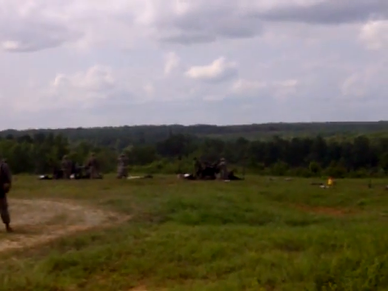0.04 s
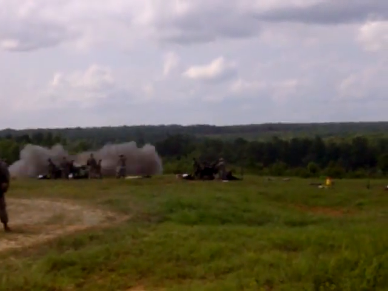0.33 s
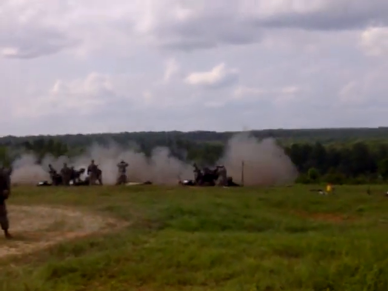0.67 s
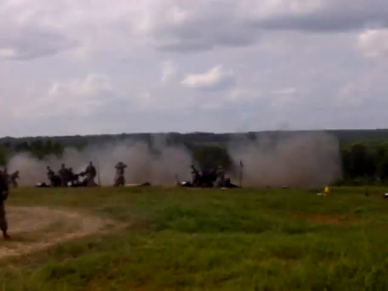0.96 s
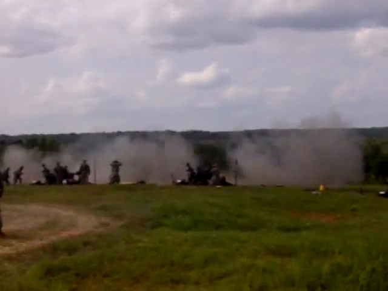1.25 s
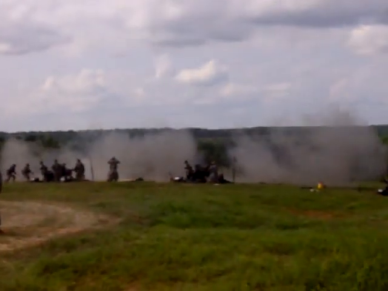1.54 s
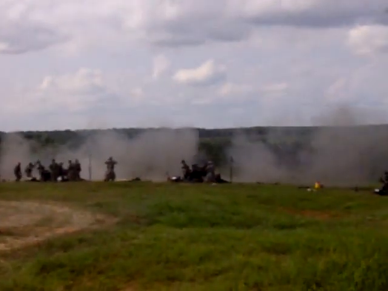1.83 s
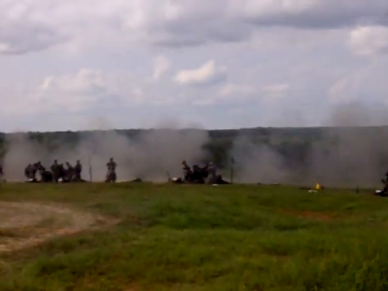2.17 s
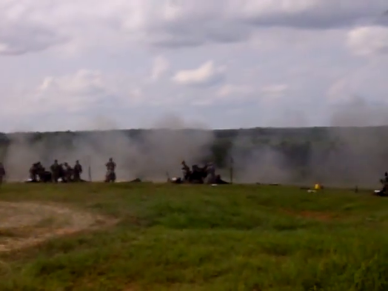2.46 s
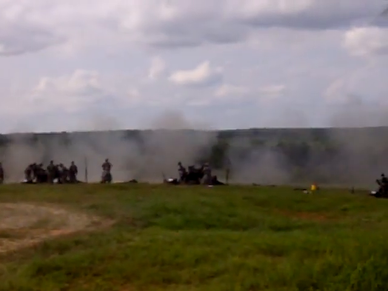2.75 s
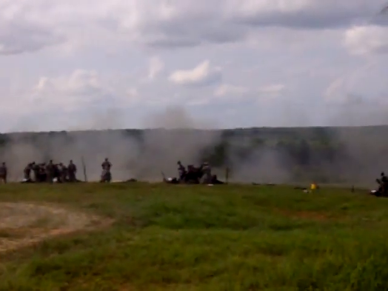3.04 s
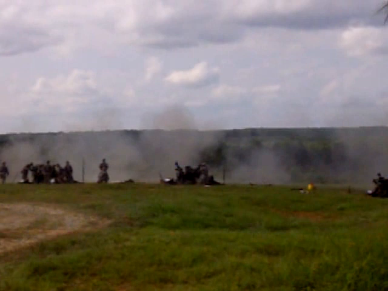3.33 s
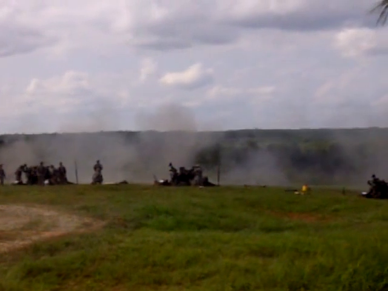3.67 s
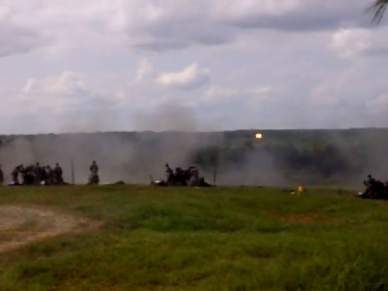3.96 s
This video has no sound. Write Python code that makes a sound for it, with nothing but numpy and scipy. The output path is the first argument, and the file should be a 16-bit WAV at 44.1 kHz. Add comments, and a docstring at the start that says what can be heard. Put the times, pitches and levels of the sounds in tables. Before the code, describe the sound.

An artillery gun fires once, its long roar echoing across an open field.

```python
"""A howitzer fires across an open field ringed by forest. Its shock front, just behind a short shudder,
overloads the microphone, which buzzes and lurches for some 50 ms. Bright scatter comes off the near
ground, then a long roar from the woods, duller the further it travels, with booms, thuds, claps and
faint whistles in it. Far off an engine idles under the steady hiss of the field."""
import sys
import numpy as np
from scipy import signal
from scipy.fft import rfft, irfft
from scipy.io import wavfile

SR = 44100
rng = np.random.default_rng(int(sys.argv[2]) if len(sys.argv) > 2 else 0)


def store_wav(level_fs):
    """Save 16-bit WAV to argv[1]."""
    pcm = np.round(np.clip(np.atleast_2d(level_fs), -1, 1) * 32767)
    wavfile.write(sys.argv[1], SR, pcm.T.astype(np.int16))


N = 176400
SHOCK_S = .7217   # the front reaches the microphone

# Spectrum of the gun's crack at the microphone: f/Hz, relative level/dB
CRACK_SPECTRUM = [(300, -3.5), (1500, 6.5), (2700, 4), (3800, 3.5), (5500, -2), (7000, -2), (8000, -21),
                  (9000, -30.5)]
def shock_front():
    """The howitzer's N-shaped pressure jump rings the microphone; a bright crack sizzles out behind it."""
    front_s, crack_decay_s, sizzle_decay_s = .0017, .00096, .031
    ring_hz, ring_decay_s = 4355, .00076
    age = np.maximum(clock() - SHOCK_S, 0)
    front = from_db(-5) * (2 * age / front_s - 1) * (age < front_s)
    ring = from_db(-1) * np.exp(-age / ring_decay_s) * np.sin(2 * np.pi * ring_hz * age)
    crack = from_db(1.5) * np.exp(-age / crack_decay_s)
    sizzle = from_db(-14) * np.exp(-age / sizzle_decay_s)
    return (clock() >= SHOCK_S) * (front + ring + (crack + sizzle) * noise(CRACK_SPECTRUM))


# Swells that reach the microphone first: t/s, length/s, f/Hz, peak level/dB
SHUDDERS = [(0.696, 0.018, 555, -22.5), (0.708, 0.0099, 330, -14)]
def shudder():
    """Two low swells just ahead of the front, probably carried by the ground."""
    out = np.zeros(N)
    for start, length, hz, db in SHUDDERS:
        age = clock() - start
        arch = np.sqrt(np.abs(np.sin(np.pi * np.clip(age / length, 0, 1))))
        out += from_db(db) * arch * np.sin(2 * np.pi * hz * age)
    return out


# Buzzes of the overloaded microphone: t/s, length/s, f/Hz, peak level/dB
BUZZES = [(0.723, 0.012, 1872, -12.5), (0.741, 0.013, 2050, -16.5), (0.758, 0.0091, 1763, -17)]
# Pressure surges that throw it to either side: t/s, signed height/full scale
LURCHES = [(0.7351, -.7), (0.739, 0.6), (0.7398, -0.76), (0.754, -0.92), (0.7559, 0.9), (0.767, -0.48),
           (0.7703, 0.81), (0.7721, -0.98), (0.7741, 0.23), (0.7778, -0.71)]
def overloaded_microphone(sound):
    """The microphone buzzes and is thrown aside; while it does, it passes less of the sound."""
    waver, duck, edge_s = .095, .33, .0019
    rise_s, sag_s = .00029, .001
    t = clock()
    wavering_time = np.cumsum(1 + waver * drift(450)) / SR
    for start, length, hz, db in BUZZES:
        held = np.clip(np.minimum(t - start, start + length - t) / edge_s, 0, 1)
        buzz = from_db(db) * held * np.sin(2 * np.pi * hz * wavering_time)
        sound = sound * (1 - duck * held) + buzz
    for start, height in LURCHES:
        age = np.maximum(t - start, 0)
        thrown = (1 - np.exp(-age / rise_s)) * np.exp(-(age / sag_s) ** 2)
        sound = sound * (1 - np.sqrt(thrown)) + height * thrown
    return sound


# Scatter off the ground near the microphone: t/s, level/dB
SCATTER_LEVEL = [(.723, -11), (.745, -15.5), (.765, -12), (.78, -23), (.81, -18), (.845, -16), (.89, -19),
                 (.94, -25.5), (1.05, -29), (1.3, -31), (1.8, -47.5), (2.5, -55)]
# Its spectrum: f/Hz, relative level/dB
SCATTER_SPECTRUM = [(60, -19.5), (200, -4), (450, 5), (1000, 6.5), (2000, 5), (2700, -1), (4300, -3),
                    (5600, -11.5), (7100, -19.5), (7800, -46)]
def near_scatter():
    """The front sprays back from the grass and the gun line."""
    return level(SCATTER_LEVEL) * echoes(SCATTER_SPECTRUM) * after_shock()


# Roar from the surrounding woods, before air loss: t/s, level/dB
ROAR_LEVEL = [(.73, -17.5), (.8, -19), (1.0, -18), (1.25, -18), (1.5, -17.5), (1.8, -18), (2.1, -19),
              (2.3, -22.5), (2.6, -27), (2.9, -31), (3.4, -32.5), (4, -35.5)]
# The lower registers from the same woods: t/s, level/dB
BOOM_LEVEL = [(.73, -24.5), (.78, -16.5), (.87, -20), (1.0, -18.5), (1.15, -18.5), (1.43, -17), (1.6, -17),
              (1.78, -16), (1.87, -16.5), (2.0, -14.5), (2.25, -18), (2.55, -18.5), (2.9, -23),
              (3.3, -25.5), (3.52, -30), (3.75, -26.5), (4, -32)]
RUMBLE_LEVEL = [(.73, -41), (.8, -26.5), (.95, -26.5), (1.25, -22.5), (1.55, -23.5), (1.75, -25),
                (2.2, -29.5), (2.5, -33.5), (2.95, -35.5), (3.5, -40.5), (3.72, -36.5), (4, -40.5)]
DEEP_BASS_LEVEL = [(.75, -40.5), (1.5, -37.5), (1.85, -31), (2.15, -28), (2.5, -34), (3.0, -38.5),
                   (4, -44.5)]
# Brighter returns from brush and stands of trees: t/s, half-width/s, level/dB
BRUSH_RETURNS = [(0.87, .04, -30.5), (1.2, 0.07, -33.5), (2.15, 0.11, -37), (2.66, 0.19, -47.5),
                 (3.25, 0.23, -47.5)]
# Spectra of these five, heard from the field: f/Hz, relative level/dB
ROAR_SPECTRUM = [(290, -31.5), (500, -1.5), (530, -4.5), (567, -3), (731, -6.5), (974, -4.5), (1240, -7.5),
                 (1470, -6), (2180, -16), (2500, -21), (2800, -20), (3610, -19), (6270, -41.5),
                 (7800, -66.5), (10100, -89), (17200, -120)]
BOOM_SPECTRUM = [(70, -24), (110, -1), (160, 5), (220, 3), (290, 1.5), (360, 3), (480, -3), (580, -8),
                 (800, -21.5), (1500, -116)]
RUMBLE_SPECTRUM = [(20, -43), (45, -23), (58, -10.5), (72, -6), (95, -6), (115, -3), (160, -22),
                   (400, -76.5)]
DEEP_BASS_SPECTRUM = [(15, -24.5), (25, -9.5), (42, 1.5), (55, 4), (70, -6.5), (150, -46.5)]
BRUSH_SPECTRUM = [(1500, -9), (2400, 5), (3000, 7), (3800, 5), (4600, -4.5), (5600, -25), (6200, -20.5),
                  (6900, -32.5), (7700, -54.5)]
def woods():
    """Dense echoes roll in from the forest: roar, boom, rumble, bright returns and a late deep bass."""
    roar = level(ROAR_LEVEL) * through_air(echoes(ROAR_SPECTRUM))
    boom = level(BOOM_LEVEL) * echoes(BOOM_SPECTRUM)
    rumble = level(RUMBLE_LEVEL) * echoes(RUMBLE_SPECTRUM)
    brush_gain = sum(from_db(db) * swell(centre, width) for centre, width, db in BRUSH_RETURNS)
    brush = brush_gain * echoes(BRUSH_SPECTRUM)
    deep_bass = level(DEEP_BASS_LEVEL) * echoes(DEEP_BASS_SPECTRUM)
    return (roar + boom + rumble + brush + deep_bass) * after_shock()


# Single echoes off the tree line, dull and hard (claps before air loss): t/s, decay/s, level/dB
THUDS = [(0.998, 0.021, -19), (1.085, 0.021, -16.5), (1.172, 0.013, -12), (1.238, 0.04, -14),
         (1.315, .045, -18.5), (1.415, 0.029, -17), (1.503, 0.032, -16.5), (1.615, 0.022, -29),
         (1.718, 0.012, -10), (1.995, 0.058, -18.5), (2.095, 0.024, -23.5), (2.183, 0.01, -20),
         (2.318, 0.012, -16), (2.68, 0.01, -18), (2.808, 0.041, -22), (3.02, .03, -26.5),
         (3.342, 0.012, -25), (3.72, .02, -34.5)]
CLAPS = [(0.826, 0.017, -16), (0.903, .014, -16.5), (1.163, 0.01, -14.5), (1.245, 0.012, -16.5),
         (1.44, 0.018, -19), (1.505, .02, -22), (2.182, 0.027, -21), (2.425, 0.038, -24.5),
         (2.566, 0.022, -25), (2.815, 0.023, -27.5)]
# Their spectra: f/Hz, relative level/dB
THUD_SPECTRUM = [(70, -24), (140, -1.5), (250, -1.5), (370, 3.5), (560, -3.5), (800, -21.5), (1500, -51.5)]
CLAP_SPECTRUM = [(400, -17), (800, 14), (1500, -2), (2400, -8), (4200, -9.5), (5600, -24), (7000, -34),
                 (7800, -54.5)]
def forest_edges():
    """Edges of the forest throw back thuds and claps; the further claps arrive duller."""
    return slaps(THUDS, THUD_SPECTRUM) + through_air(slaps(CLAPS, CLAP_SPECTRUM))


def slaps(rows, spectrum, rise_s=.0059):
    """Single echoes, each rising quickly and dying away."""
    envelope = np.zeros(N)
    for start, decay, db in rows:
        age = np.maximum(clock() - start, 0)
        fall = np.exp(-np.maximum(age - rise_s, 0) / decay)
        envelope += from_db(db) * np.minimum(age / rise_s, 1) * fall
    return envelope * echoes(spectrum)


def echoes(spectrum, per_second=7000, spread_db=2.5):
    """Countless small reflections of uneven size, arriving at random; rms 1."""
    sizes = from_db(spread_db * np.minimum(rng.exponential(1, N), 5))
    signs = rng.choice([-1, 1], N)
    arrivals = rng.random(N) < per_second / SR
    return colour(sizes * signs * arrivals, spectrum)


def through_air(sound, db_per_khz_s=.88, neutral_s=.96):
    """Air takes treble with distance: sound is made brighter before neutral_s and duller after it."""
    hz, times, frames = signal.stft(sound, SR, nperseg=512)
    khz = np.minimum(hz[:, None] / 1000, 10)
    loss_db = db_per_khz_s * khz * (times - neutral_s)
    return signal.istft(frames * from_db(-loss_db), SR)[1][:N]


# Faint whistles over the field: t/s, half-width/s, f/Hz, glide/(Hz/s), spread/Hz, rms level/dB
WHISTLES = [(1.479, .05, 3480, 0, 30, -42.5), (1.89, .04, 3230, -1, 130, -36),
            (2.1, 0.12, 2890, -300, 90, -40), (2.18, 0.038, 5010, 0.5, 260, -49.5),
            (2.19, 0.062, 6170, -600, 190, -53), (2.21, 0.051, 3800, -500, 70, -43.5),
            (2.29, 0.04, 3080, 1499.5, 130, -39), (2.31, 0.041, 4350, 0, 260, -47),
            (2.46, 0.029, 6120, -2.5, 150, -64.5), (2.48, 0.026, 3620, 500.5, 60, -44.5),
            (2.53, 0.12, 2820, 650, 55, -44.5), (2.74, 0.033, 3550, 900.5, 70, -47.5),
            (2.77, 0.062, 6160, 2, 173, -70), (2.9, 0.051, 3820, 1501, 130, -54),
            (3.241, 0.065, 3490, 3, 180.3, -51)]
def whistles():
    """Breathy, gliding whistles come and go inside the roar, perhaps from the departing shell."""
    out = np.zeros(N)
    bins_hz = np.arange(N // 2 + 1) * SR / N
    air = rfft(rng.standard_normal((2, N)))
    for centre, width, hz, glide, spread_hz, db in WHISTLES:
        fresh_air = np.roll(air, rng.integers(N // 2), axis=1)
        breath = rms_one(irfft(fresh_air * np.exp(-.5 * (bins_hz / spread_hz) ** 2), N))
        phase = 2 * np.pi * np.cumsum(hz + glide * (clock() - centre)) / SR
        whistle = breath[0] * np.cos(phase) + breath[1] * np.sin(phase)
        out += from_db(db) * swell(centre, width) * whistle
    return out


# Hum of the engine, far from the microphone: f/Hz, rms level/dB
ENGINE_PARTIALS = [(48, -67), (95.5, -46.5), (144, -61.5), (183, -51)]
def distant_engine(waver=.012, throb_db=.7):
    """An idling engine: its partials waver in pitch together and each throbs on its own."""
    wavering_time = np.cumsum(1 + waver * drift(8.2)) / SR
    out = np.zeros(N)
    for hz, db in ENGINE_PARTIALS:
        amplitude = np.sqrt(2) * from_db(db + throb_db * drift(6))
        out += amplitude * np.sin(2 * np.pi * (hz * wavering_time + rng.random()))
    return out


# Thin tones out in the field: f/Hz, rms level/dB
WHINES = [(1490, -63), (3940, -62)]
def whines(width_hz=28):
    """Two very narrow bands of noise, each holding its pitch."""
    out = np.zeros(N)
    for hz, db in WHINES:
        phase = 2 * np.pi * hz * clock()
        out += from_db(db) * (drift(width_hz) * np.cos(phase) + drift(width_hz) * np.sin(phase))
    return out


# Spectrum of a rustle in the field: f/Hz, relative level/dB
RUSTLE_SPECTRUM = [(1500, -18), (2300, 0), (3200, -15), (4300, 2), (4900, -7), (5600, -16), (7800, -35)]
def rustle():
    """One faint, short rustle before the shot."""
    return from_db(-50) * swell(centre_s=.093, width_s=.009) * noise(RUSTLE_SPECTRUM)


# Ambience of the open field: f/Hz, relative level/dB
FIELD_SPECTRUM = [(20, -23.5), (50, -13), (80, -1.5), (130, -4), (250, -0.5), (450, -3.5), (620, -2),
                  (850, -9), (1100, -9), (1420, -3.5), (1800, -14), (2300, -10.5), (2800, -17), (3900, -18),
                  (5100, -32.5), (6900, -43), (7700, -76)]
def field_hiss():
    """The steady hiss of the field, half a decibel louder after the shot."""
    return from_db(-40.5 + .5 * after_shock()) * noise(FIELD_SPECTRUM)


def from_db(db):
    """Decibels to gain."""
    return 10 ** (np.asarray(db) / 20)


def rms_one(x):
    """Scale to unit rms."""
    return x / np.sqrt(np.mean(x ** 2) + 1e-20)


def clock():
    """Time of every sample in seconds."""
    return np.arange(N) / SR


def level(rows):
    """Gain along a curve of t/s, level/dB."""
    return from_db(np.interp(clock(), *np.transpose(rows)))


def swell(centre_s, width_s):
    """A smooth rise and fall around a moment."""
    return np.exp(-.5 * ((clock() - centre_s) / width_s) ** 2)


def after_shock(rise_s=.003):
    """A gate that opens when the front arrives."""
    return np.clip((clock() - SHOCK_S) / rise_s, 0, 1)


def colour(x, spectrum):
    """Give a steady signal a spectrum of f/Hz, level/dB, empty above its last point; rms 1."""
    hz, db = np.transpose(spectrum)
    log_bins = np.log(np.maximum(np.arange(N // 2 + 1) * SR / N, 1))
    gain = from_db(np.interp(log_bins, np.log(hz), db, right=-np.inf))
    return rms_one(irfft(rfft(x) * gain, N))


def noise(spectrum):
    """Steady coloured noise; rms 1."""
    return colour(rng.standard_normal(N), spectrum)


def drift(rate_hz):
    """A smooth random wander, mostly slower than rate_hz; rms 1."""
    pole = np.exp(-2 * np.pi * rate_hz / SR)
    wander = signal.lfilter([1], [1, -2 * pole, pole * pole], rng.standard_normal(N + SR))
    return rms_one(wander[SR:])


def scene():
    """The shot and its echoes over the background, at one microphone in the open field."""
    shot = shudder() + shock_front() + near_scatter() + woods() + forest_edges()
    gunfire = overloaded_microphone(shot) + whistles()
    background = distant_engine() + whines() + rustle() + field_hiss()
    return (gunfire + background)[None]


def record(dry):
    """The small microphone thins the deep bass, the loudest peaks are flattened and the top is cut."""
    low_cut_hz, high_cut_hz, ceiling = 32, 8000, .76
    thinned = signal.sosfilt(signal.butter(2, low_cut_hz, "high", fs=SR, output="sos"), dry)
    flattened = thinned / (1 + (thinned / ceiling) ** 6) ** (1 / 6)
    return signal.sosfilt(signal.ellip(14, .05, 110, high_cut_hz, fs=SR, output="sos"), flattened)


dry = scene()
out = record(dry)
store_wav(out)
```